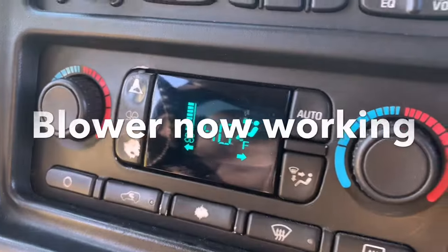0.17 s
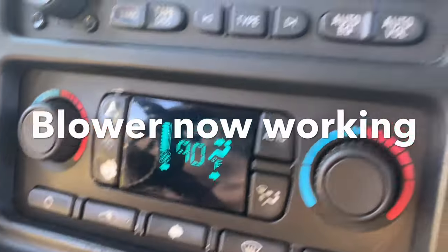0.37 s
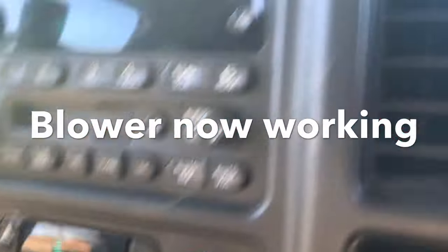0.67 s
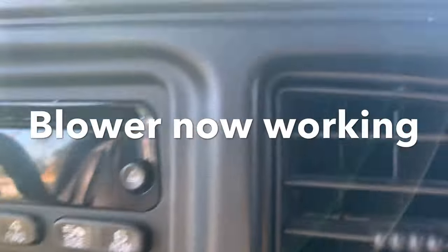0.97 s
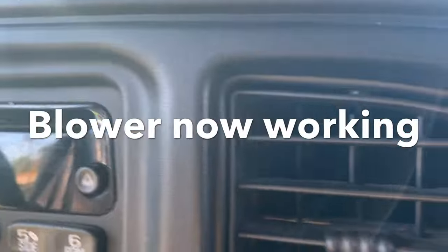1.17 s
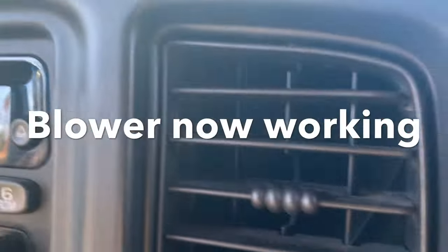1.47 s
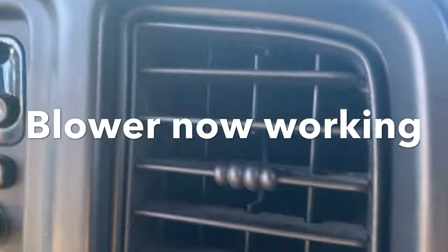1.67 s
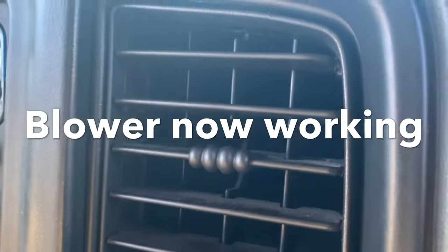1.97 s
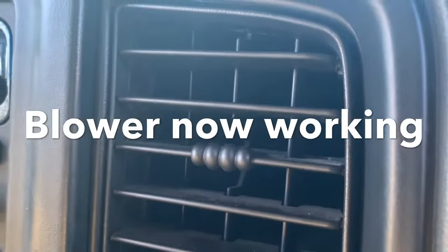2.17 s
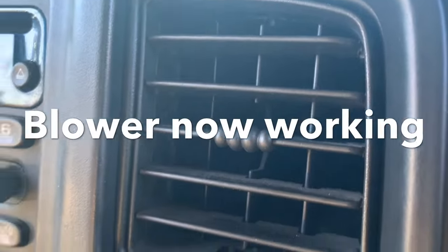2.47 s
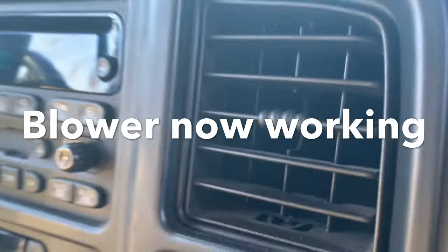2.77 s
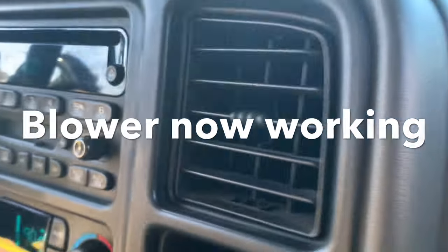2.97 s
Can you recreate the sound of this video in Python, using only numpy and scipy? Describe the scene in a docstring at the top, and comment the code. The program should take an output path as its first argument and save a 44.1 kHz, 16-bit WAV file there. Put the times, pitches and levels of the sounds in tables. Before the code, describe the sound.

Inside a vehicle, continuous vent air with low rumble; early on, loud fluttering puffs hit the moving close microphone, followed by dry case clicks, creaks and a short soft hiss, then mostly plain airflow.

```python
"""A car's blower runs throughout: shaped noise for the duct air and cabin rumble, a fuzzy motor tone.
From 0.35 s a hand-held phone, swinging from console to vent, crosses the jet: puffs of swept tone
and noise over a low surge, with one tink of decaying partials at 0.4 s. From 0.54 s its case ticks
(short damped swings) and creaks; at 0.83 s a finger brushes it, a grainy hiss that fades.
The last few ticks are sparse, over the steady air."""
import sys
import numpy as np
from scipy import signal
from scipy.fft import next_fast_len
from scipy.io import wavfile
from scipy.ndimage import uniform_filter1d

SR = 44100
rng = np.random.default_rng(int(sys.argv[2]) if len(sys.argv) > 2 else 0)


def store_pcm(level_fs):
    """Save levels as 16-bit WAV."""
    pcm = np.round(np.clip(level_fs, -1, 1) * 32767).astype(np.int16)
    wavfile.write(sys.argv[1], SR, np.atleast_2d(pcm).T)


N = 137151


def amp(db):
    """Decibels to linear gain."""
    return 10 ** (np.asarray(db) / 20)


def evened(x):
    """Scale to an rms of one."""
    return x / np.sqrt(np.mean(x ** 2) + 1e-20)


def read(points, hz):
    """Read a spectrum table along a logarithmic frequency axis."""
    f, value = np.transpose(points)
    return np.interp(np.log(hz + 1), np.log(f + 1), value)


def curve(table, x, column):
    """Read one column of a table, straight lines between its rows."""
    rows = np.array(table, float)
    return np.interp(x, rows[:, 0], rows[:, column])


def add(mix, start_s, sound):
    """Lay a two-channel sound into the mix."""
    part = mix[:, round(start_s * SR):][:, :sound.shape[1]]
    part += sound[:, :part.shape[1]]


def grid(size):
    """Bin frequencies (Hz) and frame times (s) for noise built in overlapping frames."""
    hz = np.fft.rfftfreq(size, 1 / SR)[:, None]
    return hz, np.arange(N * 4 // size + 5) * size / 4 / SR


def patches(hz, t, bins, frames):
    """Random blotches over pitch and time, smoothed over some bins and frames, rms one."""
    p = rng.standard_normal((len(t), len(hz))).T
    return evened(uniform_filter1d(uniform_filter1d(p, bins, 0), frames, 1))


def noise_pair(field_db, lead_rad, likeness, size, balance_db=0):
    """Stereo noise with the given spectrum over time; the right shares part of the left, phase-led."""
    a, b, c, d = rng.standard_normal(field_db.shape[::-1] + (4,)).T
    likeness = np.clip(likeness, 0, 1)
    left = a + 1j * b
    right = likeness * left + np.sqrt(1 - likeness ** 2) * (c + 1j * d)
    right = right * np.exp(1j * lead_rad)
    bins = np.array([left * amp(balance_db / 2), right * amp(-balance_db / 2)]) * amp(field_db)
    return evened(signal.istft(bins, nperseg=size, noverlap=size * 3 // 4)[1][:, :N])


def band_noise(lo_hz, hi_hz, size):
    """Band-passed noise of rms one; the filter's run-in is dropped."""
    sos = signal.butter(3, [lo_hz, hi_hz], "band", fs=SR, output="sos")
    return evened(signal.sosfilt(sos, rng.standard_normal(size + 2000))[2000:])


# The two microphone ports: f/Hz, likeness/0-1, left minus right/dB
PORT_MATCH = [(0, 1, -10), (490, 0.7, 1), (735, 0, 0), (1010, 0.4, 2.5), (1810, 0, -0.5), (3070, 0.38, 0),
              (5260, 0, -2), (6800, 0.48, -2.5), (7100, 1, 5), (7960, 1, -5.5), (9730, 1, 8),
              (11000, 0.96, -8.5), (12200, 0.6, 5.5), (13400, .99, 3), (14600, .9, -4), (15700, .995, -8)]
# Phase between the ports: f/Hz, right leads/half turns
PORT_LEAD = [(0, 0), (500, .05), (1700, .52), (3100, 1), (6400, 2), (8613, 3), (11025, 4), (13437, 5),
             (15850, 6), (22050, 8.5)]


def ported(field_db, hz, size):
    """Noise as two spaced ports hear it: phase, likeness and balance vary with pitch."""
    lead_rad = np.pi * curve(PORT_LEAD, hz, column=1)
    likeness, balance_db = curve(PORT_MATCH, hz, column=1), curve(PORT_MATCH, hz, column=2)
    return noise_pair(field_db, lead_rad, likeness, size, balance_db)


# Spectrum of the air at the vent: f/Hz, relative level per Hz/dB
AIR_SPECTRUM = [(200, -65), (400, -9.5), (530, -5), (650, -7.5), (1200, -6.5), (1800, -10.5), (2450, -13.5),
                (2620, -17), (2900, -18.5), (4200, -21), (5500, -26), (7000, -24.5), (8600, -24),
                (10500, -21.5), (12500, -26.5), (15500, -26), (17000, -63)]
# Duct resonances and notches: f/Hz, width/Hz, lift/dB
DUCT_RESONANCES = [(751, 92, 6), (1520, 150, 7), (1890, 160, 3), (2040, 350, 3.5), (2310, 120, 2),
                   (3680, 760, 2), (8820, 600, 4.5), (13600, 700, 5), (672, 42, -22.5), (1202, 31, -11),
                   (1768, 81, -5)]
# Air as the phone moves: t/s, level before make-up gain/dB, treble setting/dB, low body lift/dB
AIR_MOVES = [(0, -48, -21, 5), (.35, -46.5, -20.5, -2), (.6, -44.5, -17.5, -6.5), (.95, -45.5, -16, 5.5),
             (1.3, -44, -16.5, 1.5), (1.7, -44.5, -16, 1.5), (2.05, -44.5, -16.5, 3), (2.25, -45, -16, 9.5),
             (2.7, -44, -17.5, 5), (2.9, -45.5, -19, 6.5), (3.11, -44.5, -18.5, 0.5)]
AIR_MAKEUP_DB = 4.0
TREBLE_REF_DB, TREBLE_FROM_HZ = -14, 6760  # a treble setting at the reference adds nothing
BODY_HZ, BODY_OCTAVES = 640, 0.66


def rush():
    """Air through duct resonances, blotchy and flickering; treble and low body follow the phone."""
    hz, t = grid(size=1024)
    resonances = sum(db / (1 + (2 * (hz - f) / width) ** 2) for f, width, db in DUCT_RESONANCES)
    treble = np.clip(np.log2((hz + 1) / TREBLE_FROM_HZ), 0, 1)  # fades in over an octave
    body = np.exp(-(np.log2((hz + 1) / BODY_HZ) / BODY_OCTAVES) ** 2)
    field = read(AIR_SPECTRUM, hz) + resonances
    field = field + treble * (curve(AIR_MOVES, t, column=2) - TREBLE_REF_DB)
    field = field + body * curve(AIR_MOVES, t, column=3)
    field = field + 1.72 * patches(hz, t, bins=3, frames=8)  # fine blotches, dB
    field = field + 0.37 * patches(hz, t, bins=120, frames=3)  # broad flicker, dB
    level_db = curve(AIR_MOVES, np.arange(N) / SR, column=1) + AIR_MAKEUP_DB
    return ported(field, hz, size=1024) * amp(level_db)


CRACKLE_FROM_HZ, CRACKLE_STEP, CRACKLE_FALL_DB = 519, 1.424, -7  # lowest edge, edge ratio, per band
CRACKLE_NARROWING = 1.25
PUFF_ARCH, PUFF_NOISE = 0.609, .5  # share of the pitch that arches, noise against tone


def puff(half_length_s, top_hz, crackle_db):
    """A swing whose pitch peaks mid-way, and a crackle whose higher bands are weaker and shorter."""
    t = np.arange(-half_length_s, half_length_s, 1 / SR)
    bell = np.exp(-(2.406 * t / half_length_s) ** 2)
    pitch_hz = top_hz * (1 - PUFF_ARCH + PUFF_ARCH * bell)
    turns = np.cumsum(pitch_hz) / SR + rng.random()
    flutter = band_noise(top_hz / 3, top_hz * 1.215, size=len(t))
    body = bell * (np.cos(2 * np.pi * turns) + PUFF_NOISE * flutter)
    edges = CRACKLE_FROM_HZ * CRACKLE_STEP ** np.arange(5)
    crackle = np.zeros(len(t))
    for k in range(len(edges) - 1):
        band = band_noise(edges[k], edges[k + 1], size=len(t))
        shorter = bell ** (CRACKLE_NARROWING ** (2 * k))
        crackle += amp(crackle_db + k * CRACKLE_FALL_DB) * shorter * band
    return np.array([body, crackle])


# Buffeting puffs: middle t/s, level/dB, half length/s, top f/Hz, crackle relative level/dB
PUFF_EVENTS = [(.35, -6.5, .012, 170.6, -30.5), (.372, -20.5, .012, 332, -23),
               (.387, -9.5, 0.0092, 231, -26), (0.411, -19.5, 0.01194, 379, -20),
               (.403, -12.5, .013, 263, -29), (.429, -11, .012, 192, -27),
               (0.433, -13.5, 0.0105, 526, -15.5), (.443, -13.5, 0.0093, 200, -27),
               (.457, -18, 0.012, 262, -18), (0.4667, -15, 0.011, 383, -13),
               (0.4842, -13.5, .011, 398, -18), (0.4966, -8.5, .018, 419, -20.5),
               (0.507, -12.5, 0.012, 234.6, -25), (0.5245, -11.5, .012, 420, -20),
               (.478, -14, .022, 85, -29), (.517, -11, .016, 175, -18), (.531, -11, .014, 95, -35)]
SURGE_S, SURGE_RISE_S, SURGE_END_S = 0.36, 0.12, .535
SURGE_DB, SURGE_HZ = -16.5, 84.5
PUFF_LAG_RAD, CRACKLE_PAN_DB = 0.53, 12.5  # right lags, left minus right


def buffet():
    """Eddies slap the microphone: short puffs over a growing low surge."""
    puffs, t = np.zeros((2, N)), np.arange(N) / SR
    for middle_s, db, half_length_s, top_hz, crackle_db in PUFF_EVENTS:
        add(puffs, middle_s - half_length_s, amp(db) * puff(half_length_s, top_hz, crackle_db))
    grow = np.clip((t - SURGE_S) / SURGE_RISE_S, 0, 1)
    grow = grow * np.clip((SURGE_END_S - t) / 0.008, 0, 1)
    surge = band_noise(SURGE_HZ / 2.9, SURGE_HZ * 2.52, size=N) * grow
    surge = surge / np.sqrt((surge ** 2).sum() / (grow ** 2).sum())
    body = puffs[0] + amp(SURGE_DB) * surge
    # every partial turned by the same angle
    late = (signal.hilbert(body, next_fast_len(N))[:N] * np.exp(-1j * PUFF_LAG_RAD)).real
    crackle = puffs[1] * amp([[CRACKLE_PAN_DB / 2], [-CRACKLE_PAN_DB / 2]])
    return np.array([body, late]) + crackle


TICK_DECAY_S, SNAP_AT_S, SNAP_WIDTH_S = .0009, .0012, .0001


def tick(hz, snap):
    """A dry plastic click: a few swings around a sharp snap."""
    t = np.arange(400) / SR - SNAP_AT_S
    envelope = np.exp(np.minimum(3 * t, -t) / TICK_DECAY_S)  # rises three times faster than it falls
    swing = envelope * np.cos(2 * np.pi * hz * t)
    return -.65 * swing - 0.32 * snap * np.exp(-(t / SNAP_WIDTH_S) ** 2)


# Partials of the tink: f/Hz, relative level/dB, 60 dB decay/s
TINK_PARTIALS = [(4300, 4, 0.025), (5150, 5, 0.07), (5700, 0, .02), (6800, -2, .025), (10500, -8, .06)]
TINK_DB, TINK_ROUGH = -44.5, .7


def tink():
    """A small bright ring: partials decay at their own rates, roughened by noise."""
    t = np.arange(3000) / SR
    ring = sum(amp(TINK_DB + db - 60 * t / t60) * np.sin(2 * np.pi * hz * t)
               for hz, db, t60 in TINK_PARTIALS)
    ring = ring * (1 + TINK_ROUGH * evened(uniform_filter1d(rng.standard_normal(len(t)), size=24)))
    return np.array([ring, ring]) * np.minimum(t / 0.0007, 1)


# Case ticks: start t/s, level/dB, f/Hz, left minus right/dB, snap weight
CASE_TICKS = [(.5387, -25, 1550, 2, .8), (.5716, -23, 1490, 2, 1.5), (.5896, -24, 1450, 2, 1.5),
              (.6125, -24, 1400, 2, 1.6), (.6315, -26, 1560, 2, .2), (.625, -28, 1450, 2, .2),
              (.648, -27, 1100, 1, .3), (.712, -26, 1300, 0, .8), (.722, -30, 1450, 0, .3),
              (.738, -29, 1400, 0, .2), (.7741, -25, 1400, -2, .8), (.8031, -28, 1280, 0, .6),
              (.815, -28, 1400, 0, .4), (.8375, -24.5, 1270, 1.5, .9), (.851, -29, 1900, 1, .8),
              (.868, -29, 1200, 1, .8), (.891, -28, 1500, 1, .6), (.915, -29, 1100, 1, .4),
              (1.032, -30, 1300, 3, .5), (1.5464, -22, 1250, 1.5, 1.2), (1.7634, -28, 1670, 0, 1),
              (2.1904, -27, 945, 0, .3)]
CREAK_FROM_S, CREAK_TO_S, CREAK_PER_S = 0.73, 1.2, 90
CREAK_DB, CREAK_HZ, CREAK_SNAP = -44, 1240, .6  # level of the faintest creaks
TINK_S, LAG_SAMPLES = .404, 5


def handling():
    """Case ticks, a random scatter of smaller creaks and one tink; the left channel lags slightly."""
    out, t = np.zeros((2, N)), np.arange(N) / SR
    for start_s, db, hz, pan_db, snap in CASE_TICKS:
        add(out, start_s, tick(hz, snap) * amp([[db + pan_db / 2], [db - pan_db / 2]]))
    when = (rng.random(N) < CREAK_PER_S / SR) * (t > CREAK_FROM_S) * (t < CREAK_TO_S)
    creak_size = amp(CREAK_DB + 2.9 * np.minimum(rng.exponential(1, N), 3)) * when
    out += signal.oaconvolve(creak_size, tick(CREAK_HZ, CREAK_SNAP))[:N]
    add(out, TINK_S, tink())
    return np.array([np.roll(out[0], LAG_SAMPLES), out[1]])


# Spectrum of the finger's hiss: f/Hz, relative level per Hz/dB
BRUSH_SPECTRUM = [(600, 0), (1500, 5), (3000, -3.5), (5000, -10.5), (8500, -16.5), (11000, -25),
                  (16000, -40)]
BRUSH_S, BRUSH_RISE_S, BRUSH_HOLD_S, BRUSH_T60_S = .827, 0.0027, 0.027, 0.6  # hold counts from the start
BRUSH_DB, BRUSH_GRAIN_DB = -38.5, 1.2


def brush():
    """A finger slides: grainy hiss that starts quickly and fades."""
    hz, t = grid(size=256)
    field = read(BRUSH_SPECTRUM, hz) + 1.2 * patches(hz, t, bins=40, frames=4)
    grain = evened(uniform_filter1d(rng.standard_normal(N), size=90))
    noise = evened(ported(field, hz, size=256) * amp(BRUSH_GRAIN_DB * grain))
    since = np.arange(N) / SR - BRUSH_S
    rise = np.clip(since / BRUSH_RISE_S, 0, 1)
    fade_db = -60 * np.maximum(since - BRUSH_HOLD_S, 0) / BRUSH_T60_S
    return noise * rise * amp(BRUSH_DB + fade_db)


HUM_HZ, HUM_WIDTH_HZ, HUM_DB = 341.4, 5.7, -47.5


def motor():
    """The blower motor's faint tone, fuzzy because its strength and phase wander at random."""
    r = np.exp(-np.pi * HUM_WIDTH_HZ / SR)
    noise = rng.standard_normal(N) + 1j * rng.standard_normal(N)
    wander = signal.lfilter([1 - r], [1, -r], noise)
    tone = (wander * np.exp(2j * np.pi * HUM_HZ * np.arange(N) / SR)).real
    return amp(HUM_DB) * evened(tone)


# Spectrum of the cabin rumble: f/Hz, relative level per Hz/dB
RUMBLE_SPECTRUM = [(20, -64), (32, -44), (55, 2.5), (72, -1), (95, -2), (135, -3), (160, -12), (200, -17),
                   (250, -21.5), (340, -20.5), (450, -26.5), (700, -35.5), (1200, -72)]
# Rumble over time: t/s, level/dB
RUMBLE_LEVEL = [(0, -22.5), (.15, -21), (.3, -20.5), (.6, -24), (1.1, -23), (1.6, -23.5), (2.1, -22.5),
                (2.25, -23), (2.5, -22), (2.75, -24), (3.11, -24.5)]
# Lift of the rumble's upper part: t/s, lift/dB
UPPER_RUMBLE = [(0, 1), (.3, 2), (.6, 0.5), (.9, 1), (1.2, 0), (1.6, 0), (1.85, 1), (2.2, -0.5), (2.6, 0),
                (3.11, 2)]
UPPER_RUMBLE_HZ = 151
# Bass between the channels: t/s, right leads before scaling by pitch/rad, likeness/0-1
BASS_WIDTH = [(0, 1, 0.93), (.3, 1, 1), (.36, -0.0044, 0.94), (.55, -0.33, 0.97), (.86, -0.15, 0.75),
              (.93, 0, 1), (3.11, 0.21, 1)]


def rumble():
    """Low turbulence in the cabin, its stereo width and upper part shifting over time."""
    hz, t = grid(size=2048)
    tilt = np.clip(0.16 + hz / 500, 0, 2)  # the phase lead grows with pitch
    lead_rad, likeness = curve(BASS_WIDTH, t, column=1) * tilt, curve(BASS_WIDTH, t, column=2)
    upper = np.clip(np.log2((hz + 1) / UPPER_RUMBLE_HZ) * 2, 0, 1)  # fades in over half an octave
    field = read(RUMBLE_SPECTRUM, hz) + .4 * patches(hz, t, bins=4, frames=5)
    field = field + upper * curve(UPPER_RUMBLE, t, column=1)
    level_db = curve(RUMBLE_LEVEL, np.arange(N) / SR, column=1)
    return noise_pair(field, lead_rad, likeness, size=2048) * amp(level_db)


def scene():
    """Vent air, buffeting, handling and finger over the motor and the cabin."""
    return rush() + buffet() + handling() + brush() + motor() + rumble()


OVERLOAD, EDGE_HZ = .95, 15780  # ceiling of the soft clipping, top of the band


def record(dry):
    """The microphone rounds off the strongest slaps, then a steep low-pass limits the band."""
    rounded = OVERLOAD * np.tanh(dry / OVERLOAD)
    padded = np.pad(rounded, ((0, 0), (255, 255)), "reflect")
    low_pass = signal.firwin(511, EDGE_HZ, window=("kaiser", 9), fs=SR)
    return signal.oaconvolve(padded, low_pass[None], "valid", axes=1)


dry = scene()
out = record(dry)
store_pcm(out)
```